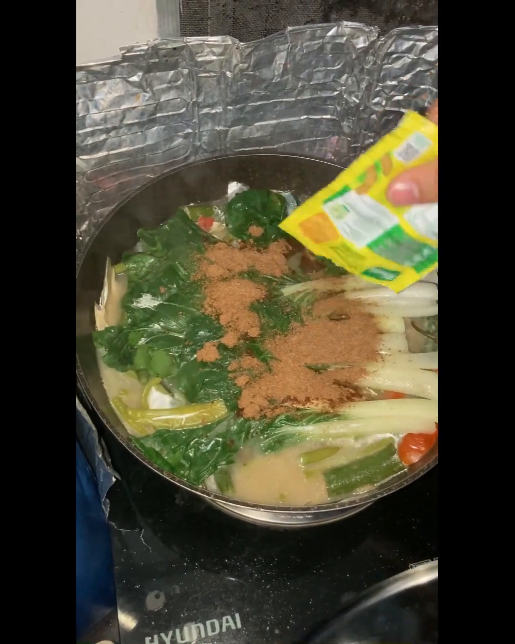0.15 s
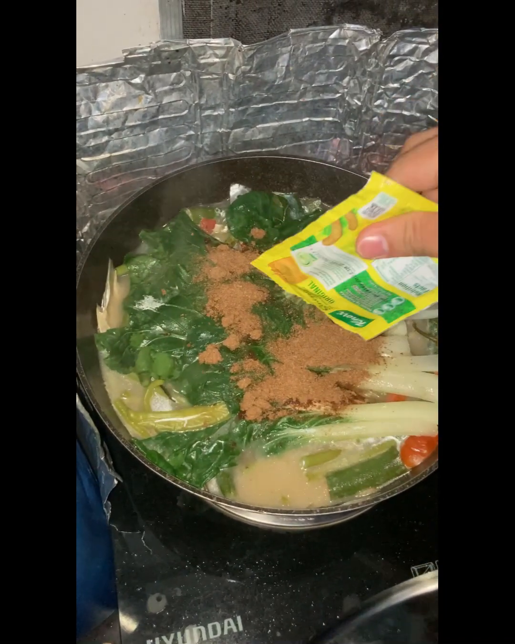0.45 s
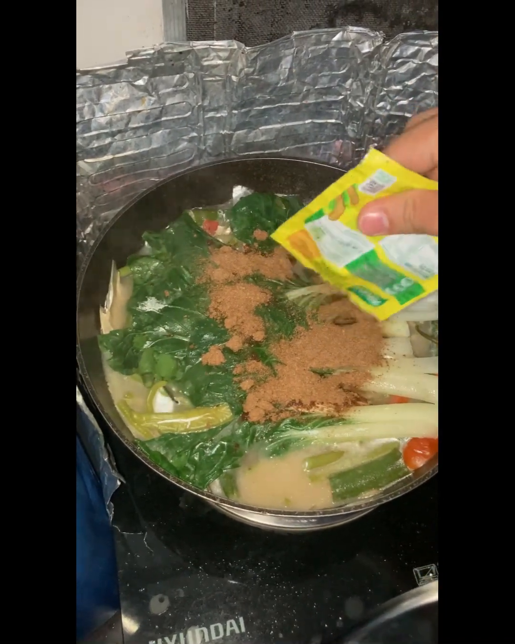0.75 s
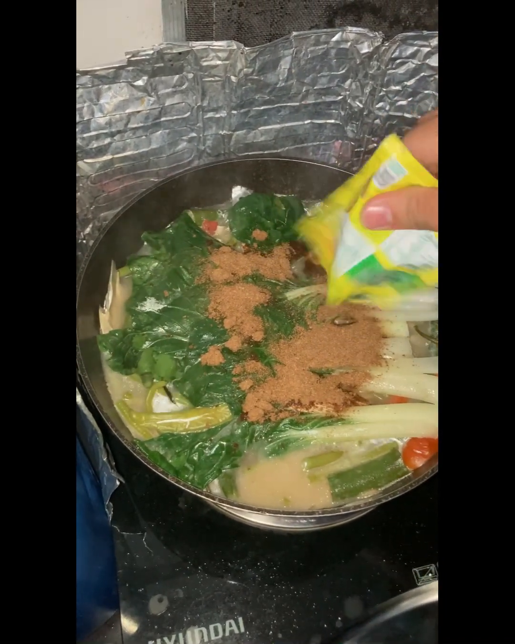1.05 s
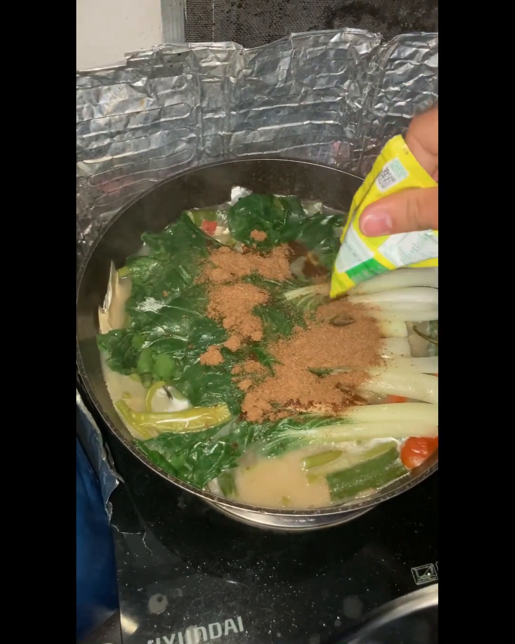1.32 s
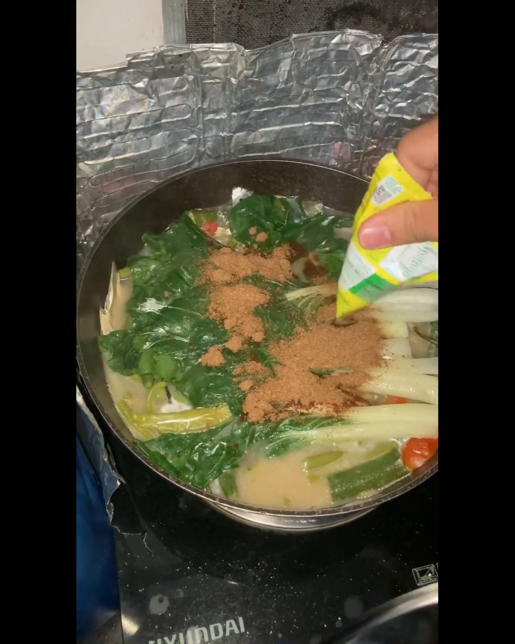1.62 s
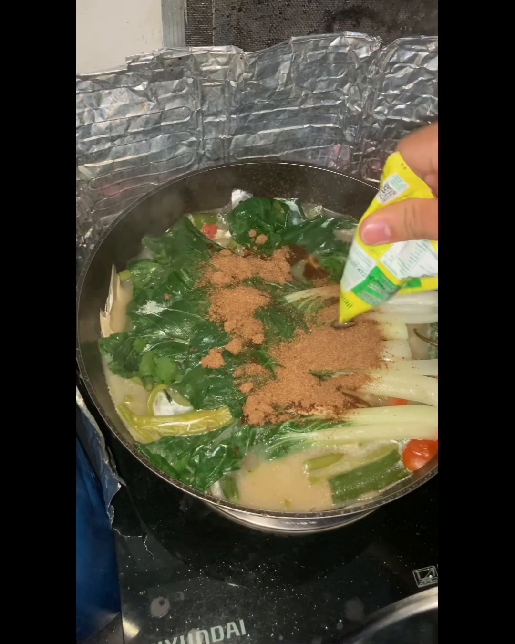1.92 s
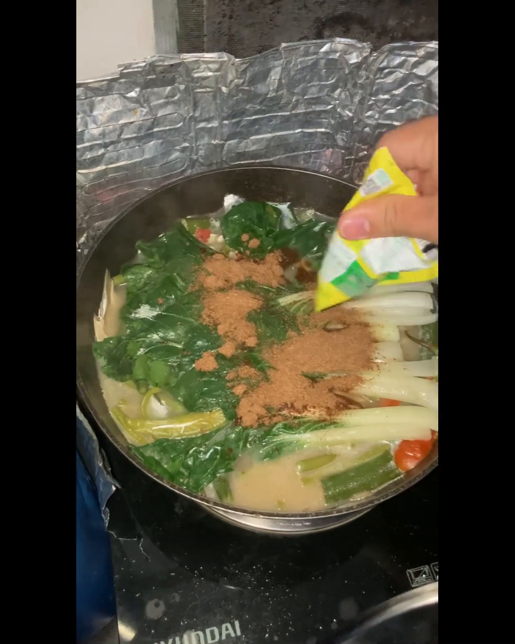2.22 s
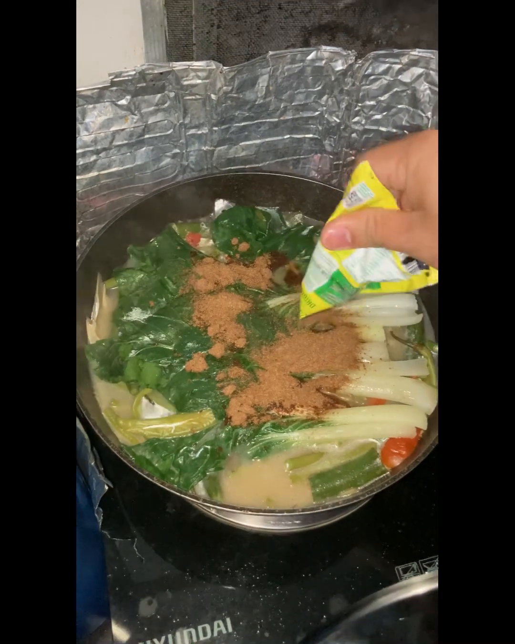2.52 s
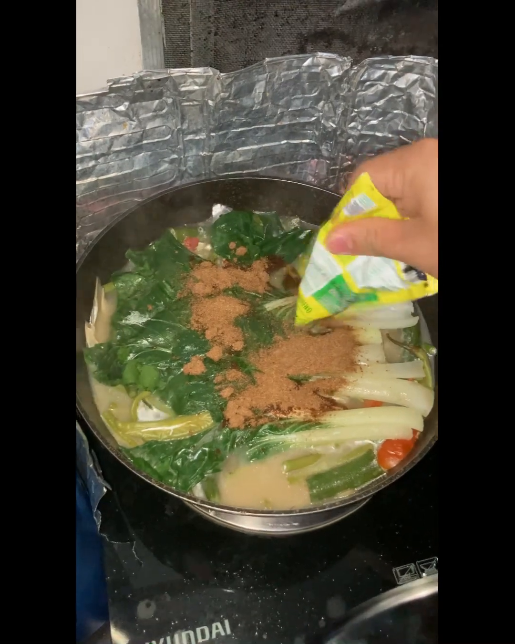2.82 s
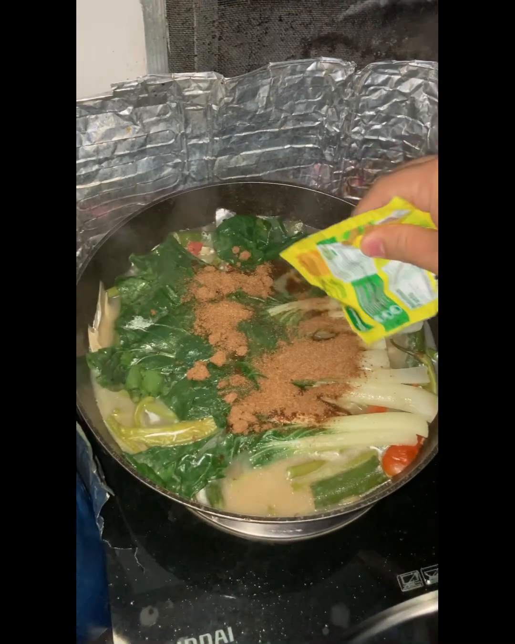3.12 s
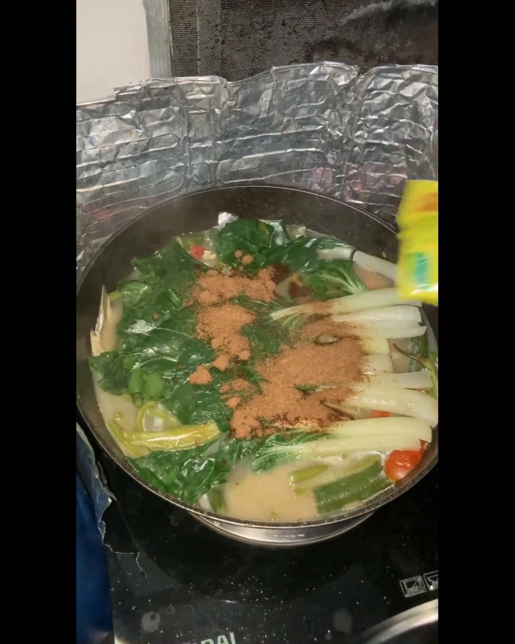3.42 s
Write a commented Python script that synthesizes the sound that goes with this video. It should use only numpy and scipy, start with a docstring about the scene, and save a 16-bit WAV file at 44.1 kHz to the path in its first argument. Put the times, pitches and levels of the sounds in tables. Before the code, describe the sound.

Close, bright crinkling of a seasoning packet in repeated wrist flicks, sparse at first, then busier and louder, ending in a few faint ticks; short dull room tail, quiet fan rumble and faint hiss.

```python
"""A plastic sachet is shaken close to a two-port microphone, over a pot in a small kitchen.
Each wrist flick swells a rustle of random powder grains and small ringing creases.
Larger creases crack: a brief build-up, one snap, a decaying noise rattle, each at its own pitch.
Film and pot resonances colour the sachet; a short dull tail follows it.
A fan rumbles low over faint hiss: filtered noise with low room resonances."""
import sys
import numpy as np
from scipy import signal
from scipy.fft import rfft, irfft, next_fast_len
from scipy.io import wavfile
from scipy.ndimage import uniform_filter1d

SR = 44100
rng = np.random.default_rng(int(sys.argv[2]) if len(sys.argv) > 2 else 0)


def transcribe(signal):
    """Save signal, clipped to [-1, 1], as a 16-bit WAV file at the path in sys.argv[1]."""
    frames = np.atleast_2d(signal).T
    limited = np.clip(frames, -1, 1)
    pcm = np.round(limited * 32767).astype(np.int16)
    wavfile.write(sys.argv[1], SR, pcm)


N = 156555  # samples

# Room noise density: (frequency [Hz], relative level per Hz [dB])
ROOM_SPECTRUM = [(28, -40), (60, -6), (300, -9.5), (430, -20), (700, -10), (1300, -16), (5000, -35),
                 (11000, -30.5), (16000, -38)]
# Low room resonances under the fan: (frequency [Hz], width [Hz], level over the spectrum [dB])
ROOM_RESONANCES = [(65.5, 7.2, 1.5), (107.8, 18, 6.5), (203.6, 38.4, 11), (285, 19.6, 3.5)]
ROOM_DB, ROOM_PRIVATE_SHARE = -47, 0.12

TAIL_DB, TAIL_T60_S, TAIL_LOWPASS_HZ = -14.5, 0.098, 6140

# Radiation of the film: (frequency [Hz], relative level per Hz [dB])
FILM_SPECTRUM = [(250, -13.5), (550, -5), (1400, -7), (2300, -4.5), (4300, 2), (6200, -5.5), (8500, -1),
                 (11500, -3.5), (13500, -8.5), (16000, -3)]
# Ringing air over the pot: (frequency [Hz], width [Hz], level over the spectrum [dB])
POT_RESONANCES = [(1060, 64, -0.5), (1977, 460, 4), (2423, 62, 4.5)]

# Snapping creases, levels before film and pot:
# (time [s], bright level [dB], dull level [dB], time to fall by 20 dB [ms])
CRACKS = [(0.0162, -33, -39.5, 14), (0.1562, -33, -37, 11), (0.2329, -19.5, -28.5, 9.5),
          (0.2778, -35, -39, 13), (0.366, -27, -27, 10), (0.3786, -19, -37, 4.5), (0.3986, -19, -33, 2.5),
          (0.4098, -14, -24, 3.5), (0.4291, -24.5, -29, 9), (0.5452, -12.5, -18.5, 6.5),
          (0.598, -32, -27, 4.5), (0.8325, -23.5, -27.5, 4), (0.8626, -36, -31, 7.5),
          (0.9207, -22, -23, 10.5), (0.9568, -16, -27, 3.5), (0.97, -22, -38, 3.5),
          (1.0471, -14.5, -26, 12), (1.0821, -17, -26.5, 15.5), (1.107, -19, -29, 8), (1.1704, -27, -27, 5),
          (1.2078, -18, -26, 8), (1.2767, -18, -29.5, 7), (1.294, -36, -25, 4.5), (1.311, -28, -34, 6.5),
          (1.383, -12, -21.5, 5.5), (1.394, -15.5, -22, 6), (1.485, -15, -30, 2.5),
          (1.504, -18.5, -25.5, 15.5), (1.5096, -13.5, -15.5, 8), (1.5385, -10.5, -23, 6),
          (1.608, -28.5, -29.5, 9), (1.657, -13.5, -22.5, 8), (1.768, -20, -49, 6), (1.782, -9.5, -23, 10),
          (1.805, -14, -38, 0.5), (1.8095, -16, -23, 5.5), (1.8148, -15, -29, 4), (1.8237, -17, -31, 9),
          (1.8424, -16.5, -22.5, 6.5), (1.8571, -11, -27, 9), (1.8905, -19.5, -30, 8.5),
          (1.938, -25, -37, 8.5), (2.0052, -15, -33, 3.5), (2.0294, -15, -31, 5), (2.0533, -19.5, -23, 3.5),
          (2.1306, -15, -36, 3), (2.1546, -22, -35, 2), (2.1807, -18.5, -18, 8.5), (2.3035, -11, -26, 6),
          (2.3779, -16, -49, 5), (2.3876, -17.5, -43, 17.5), (2.3925, -16, -30, 2),
          (2.4069, -18.5, -30, 9.5), (2.4549, -15.5, -45, 6.5), (2.4712, -20, -25, 8),
          (2.5558, -31, -30.5, 8.5), (2.579, -19, -22.5, 12.5), (2.5915, -13.5, -19.5, 11),
          (2.6134, -12.5, -26, 5.5), (2.683, -13, -21, 3), (2.7446, -20.5, -31, 6),
          (2.8123, -26.5, -33, 14.5), (2.828, -17, -26.5, 6), (2.8477, -9.5, -18, 4.5),
          (2.9017, -28, -28.5, 5), (2.918, -17, -44, 4.5), (2.959, -19, -27, 8.5),
          (3.0117, -20, -26.5, 11.5), (3.0368, -16.5, -25.5, 8.5), (3.0505, -16, -21.5, 7),
          (3.1135, -18.5, -33, 1.5), (3.145, -15.5, -29, 7), (3.1619, -11.5, -25.5, 6.5),
          (3.1739, -18, -28, 4.5), (3.252, -46, -28.5, 8), (3.2814, -40, -34, 7.5), (3.306, -44, -45, 4),
          (3.3135, -36, -43, 4), (3.3372, -41, -36, 7), (3.355, -39, -54, 2), (3.3612, -39.5, -49, 5.5),
          (3.43, -41.5, -52, 6.5), (3.51, -57, -40, 7.5)]
BUILD_UP_SHARE = 0.15  # build-up time constant / fall time
SNAP_DB = 8            # snap over its rattle
SPLIT_HZ = 5000        # dull below, bright above
BRIGHT_PITCH_HZ, DULL_PITCH_HZ = (6000, 13000), (850, 4600)

# Wrist flicks, levels before film and pot:
# (peak time [s], level [dB], time to rise by 20 dB [ms], time to fall by 20 dB [ms])
FLICKS = [(0.181, -35.5, 28, 150), (0.238, -34.5, 140, 58), (0.374, -34, 74, 170), (0.551, -29, 43, 104),
          (0.737, -26, 50, 49), (0.892, -31, 85, 64), (0.967, -33.5, 20, 70), (1.086, -23, 34, 38),
          (1.207, -25.5, 45, 71), (1.383, -22.5, 38, 40), (1.511, -28, 79, 46), (1.542, -24, 23, 30),
          (1.658, -22.5, 45, 58), (1.784, -36, 35, 52), (1.854, -28, 217, 47), (1.978, -23, 39, 51),
          (2.136, -26, 48, 26), (2.169, -27, 180, 35), (2.292, -24, 50, 45), (2.429, -25, 59, 89),
          (2.586, -24, 29, 50), (2.704, -22, 33, 61), (2.843, -20, 28.6, 24), (2.955, -22, 64, 30),
          (3.049, -20, 36, 35), (3.157, -22.5, 46, 40), (3.268, -35.5, 67, 60)]
POWDER_DB, GRAINS_PER_S, GRAIN_SPREAD_DB = -6, 6000, 2.5  # level relative to the flicks
CRINKLE_DB, CRINKLES_PER_S, CRINKLE_SPREAD_DB = -2, 500, 3.5  # level relative to the flicks
CRINKLE_FALL_MS = 4    # to fall by 20 dB
RESTING_DB = -59.5     # the held film never quite stops ticking

RING_Q, CRACK_RING_DB, CRINKLE_RING_DB = 3.3, 7, 14  # small creases are mostly their own pitch
PRIVATE_SHARE, SHARED_ABOVE_HZ = 0.7, 4500  # noise private to a port; the ports share the top

# Microphone ports: (frequency [Hz], phase by which left leads [rad], left minus right [dB])
PORTS = [(101, 0, 1.5), (580, -1.4, 4.5), (1500, -1.9, -2), (1900, -1.1, -2), (4000, -4.1, 0.3),
         (5400, -3.05, 0.4), (6400, -2.2, 0.5), (8100, -0.1, 0), (9100, 0.25, 0), (11300, 2.9, 0),
         (12300, 3.3, 0), (14500, 6.2, 0), (15800, 6.4, 0)]
CUTOFF_HZ = 15800


def from_db(db):
    """Amplitude factor for a level in dB."""
    return 10 ** (np.asarray(db) / 20)


def rms_one(x):
    """Scales to unit rms over all channels."""
    return x / np.sqrt(np.mean(x ** 2) + 1e-20)


def coloured(x, spectrum, resonances):
    """Smooth spectrum plus resonances; white noise keeps its rms."""
    size = next_fast_len(x.shape[-1] + 4096)
    hz = np.fft.rfftfreq(size, 1 / SR) + 1e-3
    knots_hz, knots_db = np.transpose(spectrum)
    gain = from_db(np.interp(np.log(hz), np.log(knots_hz), knots_db)) + 0j
    gain *= 1 + sum(from_db(db) / (1 + 1j * (hz / f - f / hz) * f / width)
                    for f, width, db in resonances)
    gain /= np.sqrt(np.mean(abs(gain) ** 2))
    return irfft(rfft(x, size) * gain, size)[..., :x.shape[-1]]


def band(x, kind):
    """Part of white noise above or below the split, scaled to the rms of the whole."""
    low_share = 2 * SPLIT_HZ / SR
    share = low_share if kind == "low" else 1 - low_share
    sos = signal.butter(2, SPLIT_HZ, kind, fs=SR, output="sos")
    return signal.sosfilt(sos, x + 1e-18) / np.sqrt(share)


def private(pair):
    """What each port hears for itself: weaker, lower range only."""
    return PRIVATE_SHARE * signal.sosfilt(signal.butter(2, SHARED_ABOVE_HZ, fs=SR, output="sos"), pair)


def port_noise(size):
    """White noise for two ports, mostly shared."""
    white = rng.standard_normal((3, size))
    return white[0] + private(white[1:])


def ringing(x, hz, top_db):
    """Adds one broad two-pole resonance standing top_db over the rest."""
    radius = np.exp(-np.pi * hz / RING_Q / SR)
    angle = 2 * np.pi * hz / SR
    zeros = (1 - radius ** 2) / 2 * np.array([1, 0, -1])
    poles = [1, -2 * radius * np.cos(angle), radius ** 2]
    return x + (from_db(top_db) - 1) * signal.lfilter(zeros, poles, x + 1e-18)


def room_noise():
    """Fan rumble and faint hiss: filtered noise, mostly shared by the channels."""
    white = rng.standard_normal((3, N))
    pair = white[0] + ROOM_PRIVATE_SHARE * white[1:]
    return from_db(ROOM_DB) * rms_one(coloured(pair, ROOM_SPECTRUM, ROOM_RESONANCES))


def kitchen_tail(x):
    """Short dull reverberation: decaying noise, independent in each channel."""
    t = np.arange(SR // 2) / SR
    tail = rng.standard_normal((2, len(t))) * from_db(-60 * t / TAIL_T60_S)
    tail *= t > 0.002  # starts after 2 ms
    tail = signal.sosfilt(signal.butter(1, TAIL_LOWPASS_HZ, fs=SR, output="sos"), tail)
    tail /= np.sqrt(np.sum(tail ** 2) / 2)
    return signal.fftconvolve(x, tail, axes=1)[:, :N]


def cracks():
    """Each crease strains briefly, snaps once, then rattles out at its own pitches."""
    ms = np.arange(2048) * 1000 / SR
    bright, dull = np.zeros((2, 2, N + len(ms)))
    for time_s, bright_db, dull_db, fall_ms in CRACKS:
        build_up = 1 - np.exp(-ms / (BUILD_UP_SHARE * fall_ms))
        shape = build_up * from_db(-20 * ms / fall_ms)
        snap = np.argmax(shape) // 2  # halfway to the peak, at the table time
        start = int(time_s * SR) - snap
        for part, db, (low_hz, high_hz) in [(bright, bright_db, BRIGHT_PITCH_HZ),
                                            (dull, dull_db, DULL_PITCH_HZ)]:
            rattle = port_noise(len(ms)) * shape
            rattle[:, snap] += from_db(SNAP_DB) * rng.choice([-1, 1])
            pitch_hz = low_hz * (high_hz / low_hz) ** rng.random()
            part[:, start:start + len(ms)] += from_db(db) * ringing(rattle, pitch_hz, CRACK_RING_DB)
    return (band(bright, "high") + band(dull, "low"))[:, :N]


def grains(per_s, spread_db):
    """Random clicks of uneven size and sign."""
    size_db = spread_db * np.minimum(rng.exponential(1, N), 5)
    clicks = from_db(size_db) * rng.choice([-1, 1], N)
    return clicks * (rng.random(N) < per_s / SR)


def powder():
    """Dense grain impacts on film, partly private to each port, at unit rms."""
    shared = grains(GRAINS_PER_S, GRAIN_SPREAD_DB)
    own = private([grains(GRAINS_PER_S, GRAIN_SPREAD_DB) for _ in "lr"])
    return rms_one(shared + own)


def crinkles():
    """Small creases give way at random as ringing noise bursts on eight pitches, at unit rms."""
    decay = from_db(-40e3 / (CRINKLE_FALL_MS * SR))  # of power, per sample
    creases = 0
    for hz in np.geomspace(1100, 12000, 8):
        onsets = grains(CRINKLES_PER_S / 8, CRINKLE_SPREAD_DB) ** 2
        power = signal.lfilter([1], [1, -decay], onsets)
        power = uniform_filter1d(power, size=40)  # give way over about 1 ms
        bursts = np.sqrt(abs(power)) * port_noise(N)
        creases = creases + ringing(bursts, hz, CRINKLE_RING_DB)
    return rms_one(creases)


def shaking():
    """Rustle amplitude: flicks rise and fall straight in dB and add in power."""
    t = np.arange(N) / SR
    power = 0
    for peak_s, db, rise_ms, fall_ms in FLICKS:
        drop_db = 2e4 * np.where(t < peak_s, (peak_s - t) / rise_ms, (t - peak_s) / fall_ms)
        power = power + from_db(db - drop_db) ** 2
    return np.sqrt(power)


def rustle(level):
    """Powder and crinkles follow the shaking; crinkles keep a resting level."""
    ticking = np.sqrt((level * from_db(CRINKLE_DB)) ** 2 + from_db(RESTING_DB) ** 2)
    return level * from_db(POWDER_DB) * powder() + ticking * crinkles()


def scene():
    """Coloured sachet, its kitchen tail and the room noise."""
    sachet = coloured(rustle(shaking()) + cracks(), FILM_SPECTRUM, POT_RESONANCES)
    return sachet + from_db(TAIL_DB) * kitchen_tail(sachet) + room_noise()


def record(dry):
    """Ports differ in phase and balance over frequency; a steep lowpass cuts the top."""
    size = next_fast_len(N + 4096)
    knots_hz, lead_rad, balance_db = np.transpose(PORTS)
    hz = np.fft.rfftfreq(size, 1 / SR)
    tilt = from_db(np.interp(hz, knots_hz, balance_db) / 2)
    lag = np.exp(-1j * np.interp(hz, knots_hz, lead_rad))
    ports = np.array([tilt + 0j, lag / tilt])
    heard = irfft(rfft(dry, size) * ports, size)[:, :N]
    return signal.sosfilt(signal.ellip(8, 0.5, 45, CUTOFF_HZ, fs=SR, output="sos"), heard)


dry = scene()
out = record(dry)
transcribe(out)
```